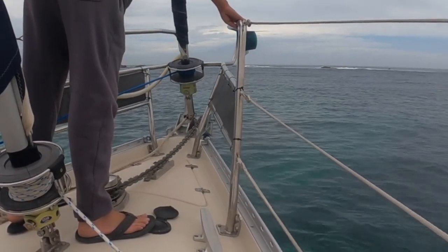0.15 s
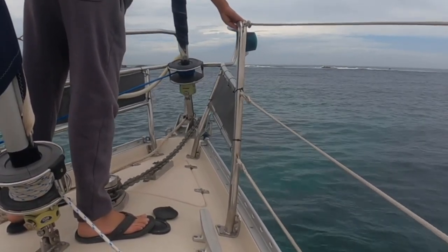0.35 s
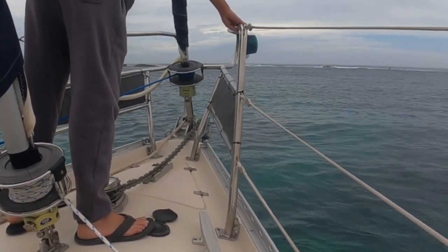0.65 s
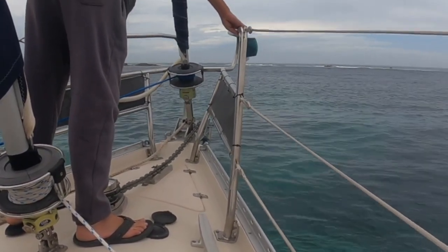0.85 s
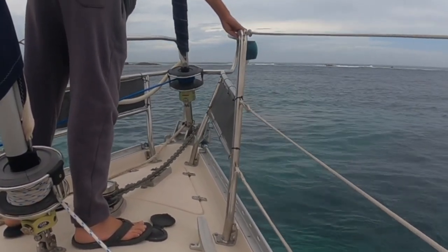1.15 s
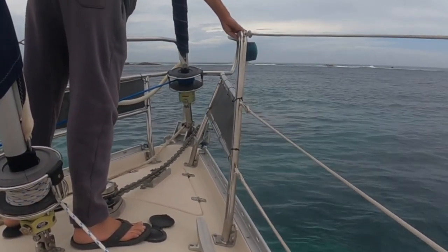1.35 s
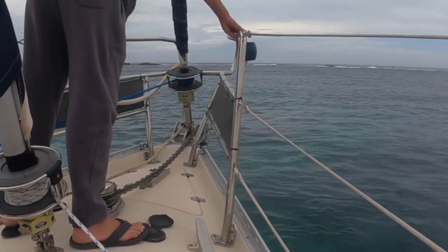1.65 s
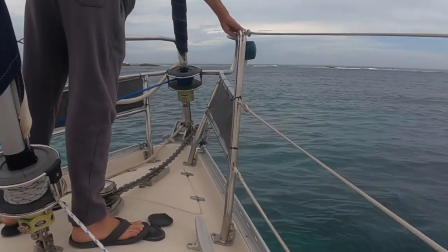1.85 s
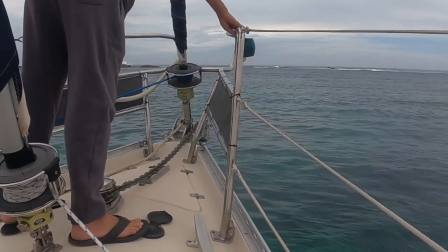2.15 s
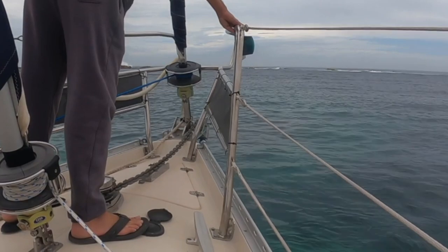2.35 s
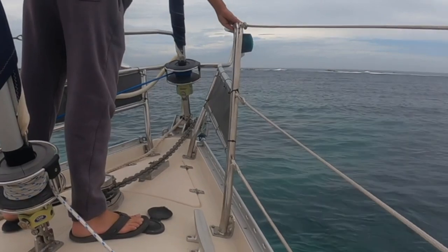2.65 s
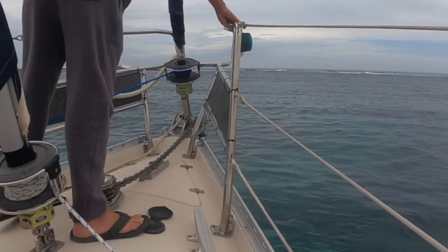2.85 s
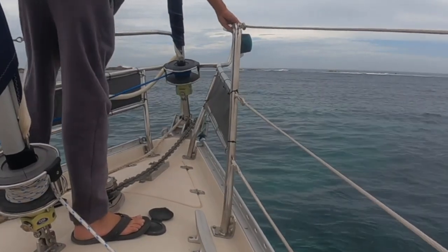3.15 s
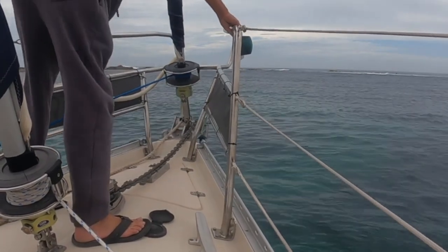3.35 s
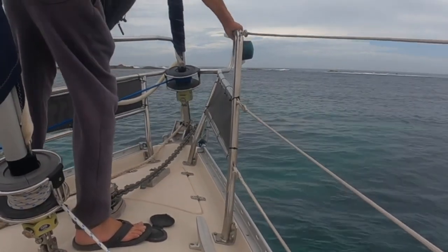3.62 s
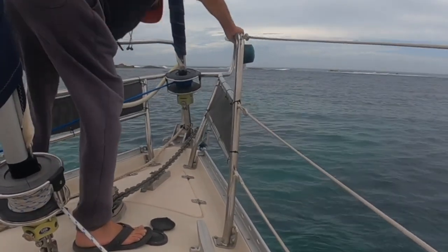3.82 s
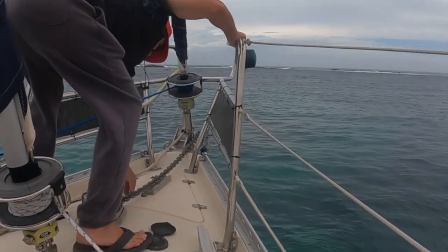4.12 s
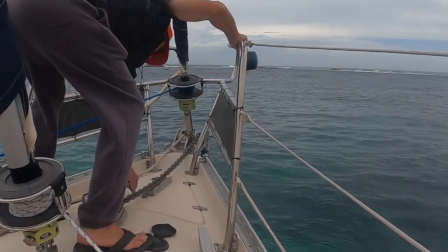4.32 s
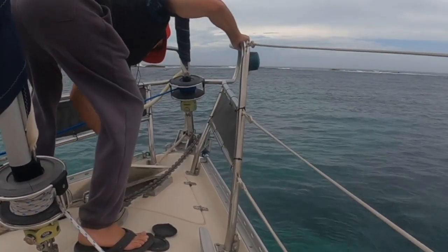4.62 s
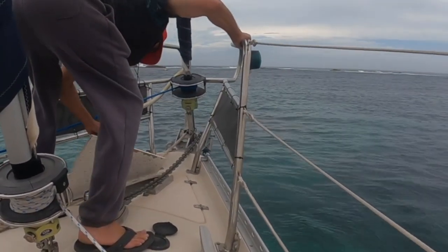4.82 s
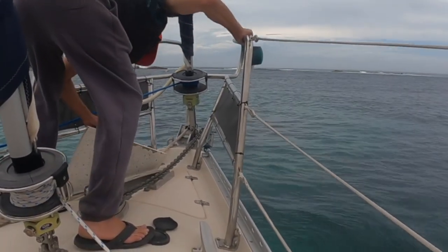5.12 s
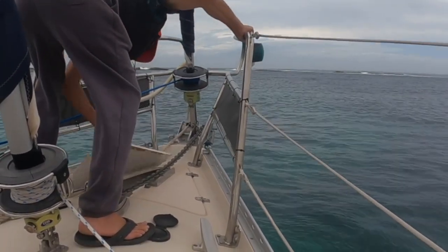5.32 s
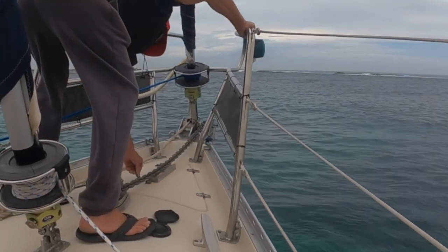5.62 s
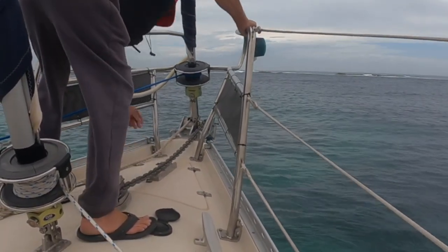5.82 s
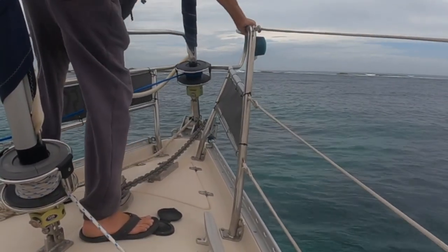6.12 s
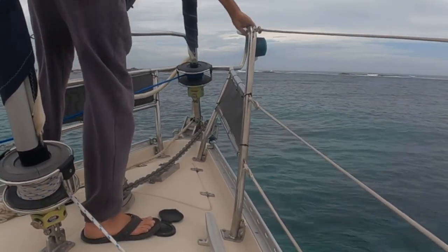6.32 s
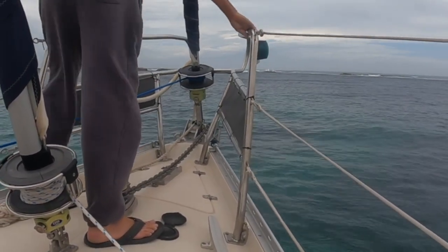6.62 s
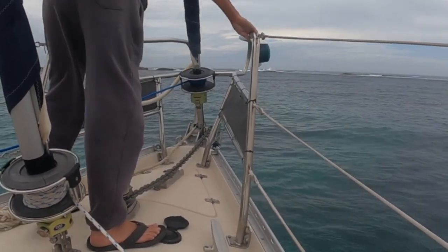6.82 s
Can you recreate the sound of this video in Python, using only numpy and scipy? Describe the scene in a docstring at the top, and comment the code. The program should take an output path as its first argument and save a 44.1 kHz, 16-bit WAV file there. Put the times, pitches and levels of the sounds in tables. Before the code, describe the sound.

Close, open-air sound on a boat's bow, treble muffled as by a camera housing. From 0 to about 2.9 s an anchor chain runs over a steel roller: about twelve uneven clanks a second, short midrange metallic rings over loose rattle and grinding. A heavier clank cluster lands near 1.9 s, another strong clank at 2.6 s; dull low thumps mix in. The chain stops around 3 s, with a few light clinks and one clearer knock at 3.2-3.5 s. A big low gust thuds at 3.6 s, and buffeting lumps with soft pops continue. Small latch clinks come at 4.15-4.4 and 4.7 s, a sharp panel crack at 4.96 s, then hollow hatch knocks around 5.55-5.7 and hard snaps at 5.9 s. Gusts peak near 6.2 s, then ease. Faint sea wash hisses steadily throughout to 7 s.

```python
"""On a boat's foredeck an anchor chain runs over roller and windlass: about twelve links a second clank as
struck, decaying steel modes over a loose rattle and grinding noise. It stops; a locker hatch is unlatched,
lifted and shut: short latch rings and cracks of damped panel noise. Dull noise lumps with pressure pops are at
first probably the chain thumping on deck, later gusts buffeting the microphone; the sea hisses faintly as
shaped noise, and the housing muffles the treble."""
import sys
import numpy as np
from scipy import signal
from scipy.fft import rfft, irfft, next_fast_len
from scipy.io import wavfile
from scipy.ndimage import uniform_filter1d, minimum_filter1d

SR = 44100
rng = np.random.default_rng(int(sys.argv[2]) if len(sys.argv) > 2 else 0)


def transcribe(u):
    """Save the signal u as a 16-bit wav file named by the first command-line argument.

    u: samples, shape (n,) or (channels, n), limited to [-1, 1]; the rate is SR.
    q: integer samples, one column per channel.
    """
    v = np.clip(np.atleast_2d(u).T, -1, 1)
    q = np.round(v * 32767).astype(np.int16)
    wavfile.write(sys.argv[1], SR, q)


N = 307374

# Low lumps: [t/s, peak level/dB, sharpness/dB];
# before 3 s probably chain thumps on deck, later gusts on the microphone
LOW_LUMPS = [(0.095, -16.5, -13), (0.902, -19, -17.5), (1.049, -26.5, -17), (1.791, -19, 2),
             (1.928, -21, -15), (2.017, -8.5, -30), (2.21, -18.5, -20), (2.581, -15, -10.5),
             (2.804, -16.5, -11), (3.506, -12.5, -27), (3.572, -5.5, -18.5), (3.638, -20, -11),
             (3.747, -22.5, -10.5), (3.842, -23, -17), (3.972, -27.5, -16), (3.992, -22, -2),
             (4.034, -30, -0.5), (4.116, -24.5, -7.5), (4.147, -19, 8.5), (4.157, -17.5, -4.5),
             (4.257, -13.5, -11.5), (4.311, -20.5, -5), (4.413, -14, -13.5), (4.481, -29.5, -14),
             (4.543, -14, -16), (4.596, -33.5, 0.5), (4.636, -16, -9.5), (4.659, -13, -14.5),
             (4.685, -9.5, -1.5), (4.824, -12.5, -11.5), (4.934, -29, 7.5), (5.041, -20.5, -8.5),
             (5.173, -29, -30.5), (5.21, -37, -13), (5.368, -8, -28.5), (5.463, -11.5, -34.5),
             (5.482, -13, -16), (5.492, -13, 1), (5.521, -20, -3), (5.566, -17.5, -9), (5.646, -13, -12),
             (5.915, -6.5, -23.5), (5.99, -11.5, -20), (6.036, -10, -15.5), (6.054, -8.5, -5.5),
             (6.083, -13.5, -13), (6.104, -10.5, 1), (6.119, -15, 0.5), (6.1561, -12, -9.5),
             (6.208, -8.5, -5.5), (6.237, -1, -4.5), (6.322, -7, -25), (6.413, -20.5, -30.5),
             (6.52, -30, -43), (6.931, -26.5, -16)]
# Loose rattle of the chain, joined by straight lines: [t/s, level/dB, brightness/dB]
LOOSE_RATTLE = [(0, -24.5, -6), (.12, -37, -19.5), (1.9, -35, -19.5), (2.3, -30.5, -13.5),
                (2.36, -42.5, -17.5), (2.85, -30, -18.5), (3.02, -40, -2.5), (3.15, -45.5, -39),
                (3.48, -52.5, -26)]

RING_OUT_S = .4          # time left for the last rings to die
HIGH_FROM_HZ = 3800      # modes above this count as treble


def from_db(db):
    """Decibels to an amplitude factor."""
    return 10 ** (np.asarray(db) / 20)


def rms_one(x):
    """Scale to an RMS of one."""
    return x / np.sqrt(np.mean(x ** 2) + 1e-20)


def in_time(rows):
    """Columns joined by straight lines in time."""
    s, *columns = np.transpose(rows)
    return [np.interp(np.arange(N) / SR, s, c) for c in columns]


def coloured(x, spectrum):
    """Filter x to a spectrum, all but silent outside its table; white noise keeps its power."""
    size = next_fast_len(N + SR)
    hz = np.fft.rfftfreq(size, 1 / SR) + 1
    table = np.array(spectrum)
    level_db = np.interp(np.log(hz), np.log(table[:, 0]), table[:, 1], left=-120, right=-120)
    return irfft(rfft(x, size) * rms_one(from_db(level_db)), size)[:N]


def drift(rate):
    """Slow chance of spread 1, changing about rate times a second; drawn at every 16th sample."""
    r = np.exp(-32 * np.pi * rate / SR)
    slow = signal.lfilter([1], [1, -2 * r, r * r], rng.standard_normal(N // 16 + 3002))
    slow = slow[3000:]   # skip the filter's start
    return np.interp(np.arange(N) / 16, np.arange(len(slow)), rms_one(slow))


def bursts(times, peaks_db, t60s, rise_s, bend=1):
    """Envelope with one rounded rise and a fall per event; bend over 1 holds first and drops late."""
    out = np.zeros(N)
    for s, db, t60, rise in np.broadcast(times, peaks_db, t60s, rise_s):
        i = round(s * SR)
        t = np.arange(min(N - i, SR // 2)) / SR
        fall = from_db(db - 60 * (t / max(t60, .01)) ** bend)
        out[i:i + len(t)] += fall * (1 - np.exp(-t / rise)) ** 2
    return out


def ring(clicks, hz, t60, contact_s):
    """A contact of some duration makes the mode swell up smoothly, then decay; a unit click rings to about 1."""
    r, p = from_db(-60 / (t60 * SR)), np.exp(-1 / (contact_s * SR))
    turn = np.exp(2j * np.pi * hz / SR)
    push = signal.lfilter([(1 - p) ** 2], [1, -2 * p * turn, (p * turn) ** 2], clicks + 1e-18)
    return signal.lfilter([1], [1, -r * turn], push).imag


def strike(events, modes, small, focus_db, scatter_db, contact_s, chatter_s, chatter_db):
    """Blows ring most near their own pitch, then chatter; small(hz) adds random contacts to each mode."""
    s, peak_db, pitch_hz, treble_db = np.transpose(events)
    first = max(int((s.min() - RING_OUT_S) * SR), 0)
    last = int((s.max() + RING_OUT_S) * SR)
    out, fade = np.zeros(N), np.exp(-1 / (chatter_s * SR))
    scatter = rng.standard_normal((len(s), len(modes)))
    late = rng.random((len(s), len(modes)))
    for k, (hz, mode_db, t60) in enumerate(modes):
        apart = np.minimum(np.abs(np.log2(hz / pitch_hz)) / 0.3, 1)   # 1 from 0.3 octaves off the pitch
        upper = np.clip(np.log2(2 * hz / HIGH_FROM_HZ), 0, 1)         # dull blows spare the upper modes
        share_db = mode_db - focus_db + scatter_db * scatter[:, k] + upper * (treble_db + 16.0)
        clicks = small(hz) * from_db(mode_db)
        at = (s + 0.0049 * apart * late[:, k]) * SR                   # far modes are reached a little later
        clicks[at.astype(int)] += from_db(peak_db + apart * np.minimum(share_db, 0))
        clicks = clicks[first:last]
        chatter = signal.lfilter([1], [1, -fade], clicks + 1e-18) * rng.standard_normal(len(clicks))
        out[first:last] += ring(clicks + from_db(chatter_db) * chatter, hz, t60, contact_s)
    return out


def sea():
    """Far, smooth wash of small waves: shaped noise whose level barely drifts."""
    # Spectrum of the wash: [f/Hz, level/dB per Hz]
    wash_spectrum = [(180, -17), (465, -15.5), (712, -19), (3000, -34.5), (6000, -51.5), (7800, -80)]
    level_db = -64 + 0.32 * drift(2.8)
    return from_db(level_db) * rms_one(coloured(rng.standard_normal(N), wash_spectrum))


def pops():
    """A run of four short pressure pops in each low lump; sharper lumps pop higher."""
    base_hz, octaves_per_db, pop_cycles, first_db = 675, .05, 2.35, -6
    # later pops fall within this time, weaker, their pitch scattered either way
    spread_s, loss_db, scatter_octaves = .035, 10, 0.41
    out, chance = np.zeros(N + SR), rng.random((len(LOW_LUMPS), 4, 3))
    for (s, peak_db, sharp_db), run in zip(LOW_LUMPS, chance):
        for k, (late, pitch, sign) in enumerate(run):
            late = late * (k > 0)   # the first pop opens the lump
            octaves = octaves_per_db * sharp_db + scatter_octaves * (2 * pitch - 1) * (k > 0)
            hz = base_hz * 2 ** octaves
            cycles = np.arange(int(pop_cycles / hz * SR)) * hz / SR
            i = round((s + spread_s * late) * SR)
            size = from_db(peak_db + first_db - loss_db * late - 2.8 * (k > 0)) * np.sign(sign - .5)
            out[i:i + len(cycles)] += size * np.sin(2 * np.pi * cycles) * np.hanning(len(cycles))
    return out[:N]


def wind_and_thumps():
    """Steady wind and uneven low lumps of noise; sharper lumps carry more of the higher noise."""
    # Steady wind on the microphone: [t/s, level/dB]
    steady_wind = [(0, -43), (1.35, -50.5), (2.0, -37.5), (2.4, -51), (3.45, -53), (3.8, -32.5),
                   (3.92, -58), (4.1, -46.5), (4.46, -52.5), (4.85, -38), (5.1, -63.5), (5.34, -77.5),
                   (5.42, -44.5), (5.6, -32), (5.84, -44.5), (6.0, -33.5), (6.28, -36.5), (6.46, -56.5),
                   (6.97, -38)]
    # Deep bass against the rest: [t/s, level/dB]
    bass_gain = [(0, -13.5), (.8, -4.5), (1.1, 13), (1.5, -1), (2.8, 12), (3.5, 2), (4.6, -12.5),
                 (5.2, 5.5), (6.97, 9)]
    # Spectra of the dull body and the sharper edge: [f/Hz, level/dB per Hz]
    body_spectrum = [(30, -22.5), (130, 0.5), (290, 4), (450, -2.5), (700, -14), (1000, -40.5)]
    edge_spectrum = [(400, -4.5), (650, 6.5), (1250, -5), (1800, -27), (2600, -46.5)]
    bass_hz = 114.8
    t60_s, bend = 0.099, 1.28   # a lump holds, then dies ever faster
    level_db, = in_time(steady_wind)
    bass_db, = in_time(bass_gain)
    s, peak_db, sharp_db = np.transpose(LOW_LUMPS)
    uneven_noise = from_db(3.37 * np.tanh(drift(99.0))) * rng.standard_normal(N)
    steady = from_db(level_db + 7.26 * np.tanh(drift(30.0)))
    body = steady + bursts(s, peak_db - 14.5, t60_s, rise_s=0.0033, bend=bend)
    edge_bursts = bursts(s, peak_db + sharp_db - 8.0, 0.74 * t60_s, rise_s=0.0016, bend=bend)
    edge = from_db(-15.5) * steady + edge_bursts
    dull = coloured(body * uneven_noise, body_spectrum)
    deep = signal.sosfilt(signal.butter(1, bass_hz, fs=SR, output="sos"), dull)
    deep_change = deep * (from_db(bass_db) - 1)
    return pops() + dull + deep_change + coloured(edge * uneven_noise, edge_spectrum)


def latch():
    """Latch and hinge clink: small metal parts ring for a few hundredths of a second at most."""
    # Clinks: [t/s, peak level/dB, favoured pitch f/Hz, treble level/dB]
    clinks = [(3.7474, -45, 4330, -19), (4.149, -33, 1945, -66), (4.1899, -31, 2660, -18),
              (4.259, -36.5, 2245, -21.5), (4.3625, -26, 2120, -28.5), (4.374, -41.5, 3875, -9.5),
              (4.7197, -33, 2357, -42), (4.7334, -24, 3180, -72), (4.817, -63, 3780, 3),
              (5.538, -37.5, 3300, -25), (5.689, -37, 3875, -6)]
    # Modes of latch and hinge: [f/Hz, level/dB, t60/s]
    latch_modes = [(1945, 10.5, 0.0078), (2492, -18, 0.03), (3242, -5.5, 0.0069), (3875, -3.5, 0.035),
                   (4220, -26.5, 0.025), (4810, -1.5, 0.012), (5270, -6, 0.012), (6160, -20, 0.036)]
    rings = strike(clinks, latch_modes, lambda hz: np.zeros(N), focus_db=19.5, scatter_db=5.0,
                   contact_s=0.00019, chatter_s=0.011, chatter_db=-15.0)
    return from_db(-2.5) * rings


def panel_snaps():
    """Three contacts of the panel, each one sharp snap: a single mode that dies at once."""
    # Snaps: [t/s, peak level/dB]
    snaps = [(4.9652, -14.5), (5.8965, -6), (5.9266, -9.5)]
    contacts = np.zeros(N)
    for s, peak_db in snaps:
        contacts[round(s * SR)] = from_db(peak_db)
    return ring(contacts, hz=2050, t60=0.0076, contact_s=0.0001)


def hatch_panel():
    """The damped panel cracks on its seat: noise with hollow resonances that dies, its treble faster."""
    # Panel banging on its seat: [t/s, peak level/dB, treble level/dB]
    knocks = [(4.184, -25.5, -8.5), (4.9611, -9, -33), (5.541, -17, -20), (5.652, -27.5, -41.5),
              (5.682, -22.5, -3), (5.699, -8.5, -14), (5.714, -10.5, -21.5), (5.7242, -12.5, -8),
              (5.872, -27, 14.5), (5.8913, -13.5, 5.5), (5.921, -13.5, 5.5), (5.9673, -20.5, -43),
              (6.01, -25, -34)]
    # Spectrum of the panel noise: [f/Hz, level/dB per Hz]
    panel_spectrum = [(530, -4.5), (900, -11), (1940, -9.5), (6300, -27), (8700, -48.5), (12500, -74.5)]
    # Hollow resonances of the panel: [f/Hz]
    hollow_hz = (1122, 1630, 1970, 2500, 3090, 3850, 5000)
    width_hz, hollow_db, split_hz = 71, -4.5, 3300
    s, peak_db, treble_db = np.transpose(knocks)
    panel = coloured(rng.standard_normal(N), panel_spectrum)
    hollow = sum(signal.lfilter(*signal.iirpeak(hz, hz / width_hz, fs=SR), panel) for hz in hollow_hz)
    panel = panel + from_db(hollow_db) * hollow
    low = rms_one(signal.sosfilt(signal.butter(3, split_hz, fs=SR, output="sos"), panel))
    high = rms_one(signal.sosfilt(signal.butter(3, split_hz, "high", fs=SR, output="sos"), panel))
    rise_s = 0.00073 * from_db(-1.1 * (peak_db + 2.5))   # weak knocks rise slowly, strong ones fast
    clatter = from_db(4.5 * drift(120.))                 # many uneven contacts, then a smooth tail
    crack = clatter * bursts(s, peak_db - 8.5, 0.091, rise_s)
    crack = crack + bursts(s, peak_db - 23.0, 0.22, rise_s=0.004)
    shine = clatter * bursts(s, peak_db + treble_db - 5.5, 0.053, 1.5 * rise_s)
    shine = shine + bursts(s, peak_db + treble_db - 22.0, 0.15, rise_s=0.0055)
    return crack * low + shine * high


def hatch():
    """The locker hatch: clinking latch and hinge, and the panel banging and snapping on its seat."""
    return latch() + panel_snaps() + hatch_panel()


def blows():
    """Every blow on the steel as (s, peak dB, pitch Hz, treble dB): links, their first touches, whips."""
    # Links seating in turn, and chain whipping off the beat with its last swings after the stop:
    # [t/s, peak level/dB, favoured pitch f/Hz, treble level/dB]
    links = [(0.0854, -12.5, 1736, -17), (0.2, -36, 3890, -9), (0.2532, -15, 1810, -14.5),
             (0.4163, -17, 1401, -14.5), (0.51, -33.5, 3890, -6), (0.5924, -17, 1737, -13),
             (0.6828, -23, 2960, -8), (0.7662, -15, 1810, -11), (0.85, -24, 2810, -9.5),
             (0.9292, -12, 1782, -11.5), (1.0254, -28.5, 4360, -15), (1.103, -35, 1710, -5.5),
             (1.176, -22, 2200, -9.5), (1.27, -23.5, 2800, -14), (1.3417, -31, 1370, -27),
             (1.4368, -21, 1840, -10.5), (1.534, -32, 4200, -3.5), (1.6125, -22.5, 1767, -9.5),
             (1.667, -31.5, 2240, 0), (1.78, -20.5, 1810, -3.5), (1.8753, -24.5, 2870, -8.5),
             (1.951, -15, 1790, -34.5), (2.0574, -24, 960, -9.5), (2.1215, -18, 1781, -9),
             (2.2101, -25, 2207, -7.5), (2.2645, -32, 2971, -1.5), (2.4158, -31.5, 2190, -7),
             (2.4692, -18.5, 1780, -6.5), (2.5506, -28.5, 3122, -13.5), (2.621, -10.5, 1793, -17.5),
             (2.719, -27, 3090, -8), (2.7689, -25, 2239, -10), (2.891, -24.5, 3210, -7),
             (2.917, -25.5, 960, -18)]
    whips = [(0.037, -28, 1314, -22), (0.231, -28, 1680, -41), (1.7386, -25.5, 1460, -38),
             (1.909, -14, 1330, -34), (1.9138, -13, 1884, -42), (1.921, -6.5, 1032, -50),
             (2.024, -18.5, 3303, -49), (2.4992, -27.5, 2970, -3), (2.821, -24, 1650, -10),
             (3.221, -35.5, 2754, 2.5), (3.2934, -38.5, 6030, -1), (3.316, -40, 4700, -12),
             (3.352, -15, 1687, -42), (3.395, -34, 3480, -20), (3.418, -30.5, 1230, -22.5),
             (3.502, -44, 3173, -35)]
    link_s = .085                     # one link's time; one lies flat, the next on edge
    lead_s, touch_db = .018, -18.5    # a flat link touches lightly before it drops home
    low_hz, high_hz = 900, 3200       # first touches ring anywhere between
    s, peak_db, _, treble_db = np.transpose(links)
    flat = np.round(s / link_s) % 2 == 1
    touch_hz = low_hz * (high_hz / low_hz) ** rng.random(len(s))
    touches = np.transpose([s - lead_s, peak_db + touch_db, touch_hz, treble_db])[flat]
    return np.vstack([links, touches, whips])


def pings(events):
    """The struck link itself rings hard and short at the blow's own pitch."""
    rise_s, t60_s, level_db = 0.0012, 0.016, 2
    out, t = np.zeros(N), np.arange(SR // 10) / SR
    for s, peak_db, pitch_hz, _ in events:
        shape = from_db(peak_db + level_db - 60 * t / t60_s) * (1 - np.exp(-t / rise_s)) ** 2
        i = round(s * SR)
        out[i:i + len(t)] += shape * np.sin(2 * np.pi * pitch_hz * t)
    return out


def grind(slide, hiss):
    """Rubbing steel in third-octave bands, each catching and slipping on its own."""
    # Spectrum of links sliding on steel: [f/Hz, level/dB per Hz]
    rub_spectrum = [(240, -39), (400, -7.5), (1570, -3), (2460, -12.5), (4390, -17.5), (8700, -35.5),
                    (11300, -70.5)]
    out, end = np.zeros(N), int((LOOSE_RATTLE[-1][0] + RING_OUT_S) * SR)
    edges_hz = 400 * 2 ** np.arange(0, 4.7, 1 / 3)
    rough = [coloured(rng.standard_normal(N), rub_spectrum) for _ in range(2)]   # neighbours differ
    for k, (low, high) in enumerate(zip(edges_hz, edges_hz[1:])):
        band_filter = signal.butter(2, [low, high], "band", fs=SR, output="sos")
        band = signal.sosfilt(band_filter, rough[k % 2][:end])
        if low > 3000:
            grip = hiss * from_db(6.5 * drift(30.0))
        else:
            grip = slide * from_db(6.65 * drift(13.0))
        out[:end] += band * grip[:end]
    return out


def top_band(hiss):
    """Faint band-passed noise, 12.5 to 15.2 kHz, following the hiss; level set to fall 11 dB a second."""
    top = signal.butter(4, [12500, 15200], "band", fs=SR, output="sos")
    level_db = -6 - 11 * np.arange(N) / SR
    return from_db(level_db) * hiss * signal.sosfilt(top, rng.standard_normal(N))


def chain():
    """Seating links and random small contacts ring the steel; each link also grinds for a moment."""
    # Modes of the chain and its steel guides: [f/Hz, level/dB, t60/s]
    steel_modes = [(960, -6, 0.063), (1083, -3.5, 0.016), (1330, 1, 0.032), (1780, 5, 0.028),
                   (2193, -11, 0.076), (2665, -2, 0.02), (2945, 2.5, 0.02), (3122, -3, 0.05),
                   (4090, -16, 0.076), (4390, -1, 0.017), (5850, -13, 0.021), (6150, -25, 0.026),
                   (7970, -31, 0.038)]
    slack_s, slack_drag_db = 3.1, -5.5   # once the chain hangs still, blows ring and hardly drag
    events = blows()
    s, peak_db, _, treble_db = events.T
    rattle_db, bright_db = in_time(LOOSE_RATTLE)
    rattle_db = rattle_db - 200 * (np.arange(N) > LOOSE_RATTLE[-1][0] * SR)   # silent after its last row

    def contacts(hz):
        """Sparse uneven touches, about 110 a second, each reaching one mode."""
        out, at = np.zeros(N), np.flatnonzero(rng.random(N) < 110. / SR)
        size_db = 12.53 * np.minimum(rng.exponential(1, len(at)), 3.5)
        tone_db = (hz > HIGH_FROM_HZ) * (bright_db[at] + 17.5)
        out[at] = from_db(size_db + rattle_db[at] - 42.0 + tone_db)
        return out

    clanks = strike(events, steel_modes, contacts, focus_db=17.0, scatter_db=5.5, contact_s=0.00024,
                    chatter_s=0.0079, chatter_db=-22.5)
    drag_db = 0.66 * peak_db - 18.5 + slack_drag_db * (s > slack_s)   # hard blows are more ring than drag
    slide = bursts(s, drag_db, 0.11, rise_s=0.0057) + from_db(rattle_db - 8.0)
    # the link hisses over the roller just before it seats
    hiss = bursts(s - .008, drag_db + treble_db + 14.0, 0.12, rise_s=0.0065)
    hiss = hiss + from_db(rattle_db + bright_db - 8.0)
    return from_db(-1.0) * clanks + pings(events) + grind(slide, hiss) + top_band(hiss)


def scene():
    """All sources in the open air."""
    return (sea() + wind_and_thumps() + hatch() + chain())[None]


def record(dry):
    """The housing muffles the treble, rumble is cut, a limiter holds the peaks; the top is cut."""
    rumble_hz, housing_hz, cutoff_hz = 45., 10730, 15600
    x = signal.sosfilt(signal.butter(2, rumble_hz, "high", fs=SR, output="sos"), dry)
    x = signal.sosfilt(signal.butter(6, housing_hz, fs=SR, output="sos"), x)
    room_left = np.minimum(.64 / (np.abs(x) + 1e-9), 1)
    gain = uniform_filter1d(minimum_filter1d(room_left, size=301), size=301)   # sizes in samples
    return signal.sosfilt(signal.cheby2(12, 70, cutoff_hz, fs=SR, output="sos"), gain * x)


dry = scene()
out = record(dry)
transcribe(out)
```